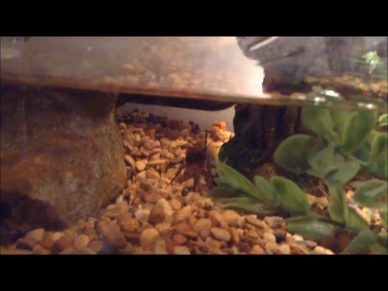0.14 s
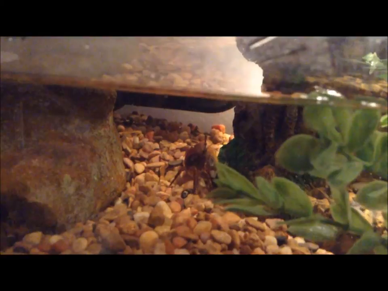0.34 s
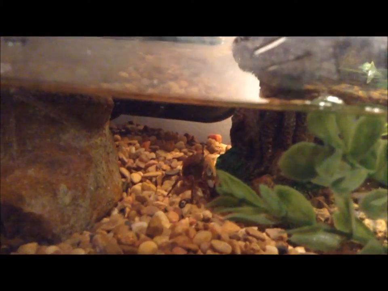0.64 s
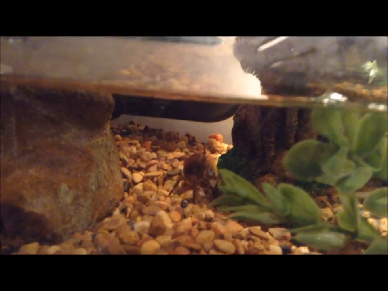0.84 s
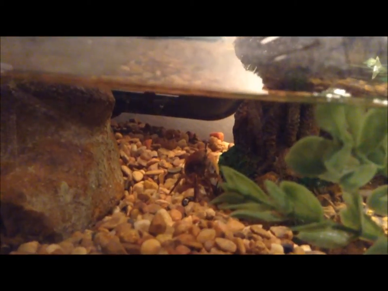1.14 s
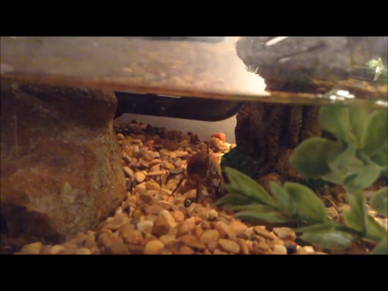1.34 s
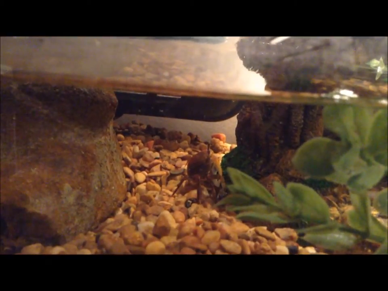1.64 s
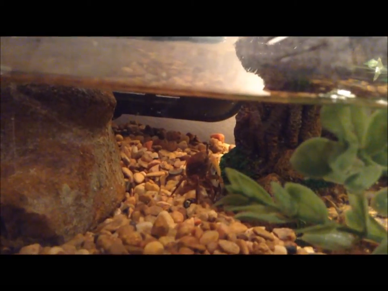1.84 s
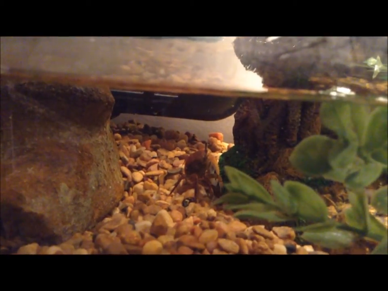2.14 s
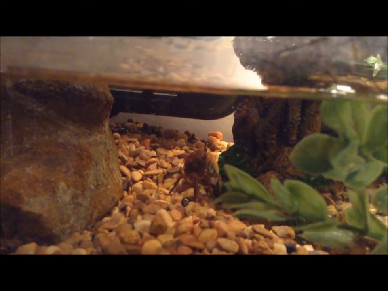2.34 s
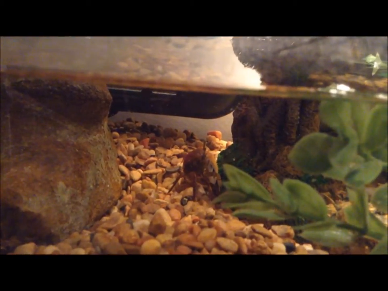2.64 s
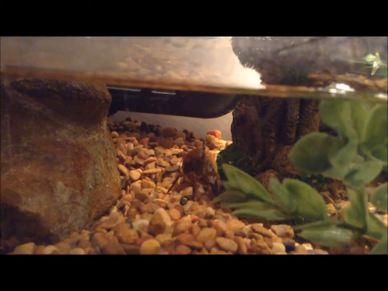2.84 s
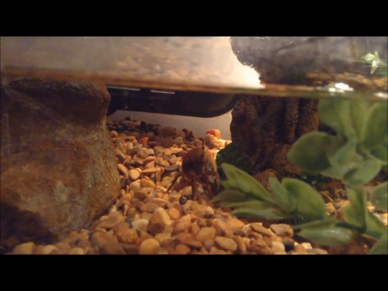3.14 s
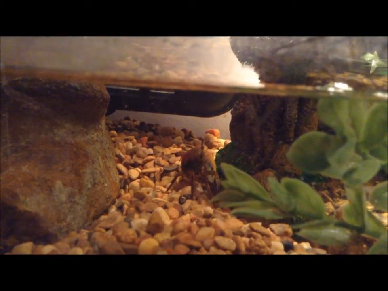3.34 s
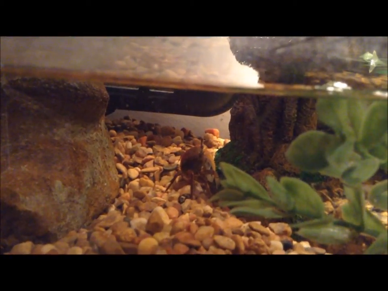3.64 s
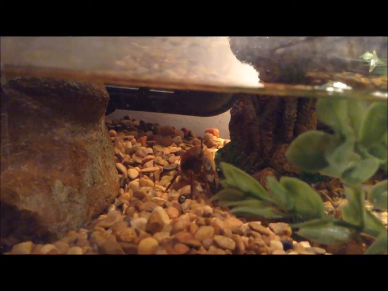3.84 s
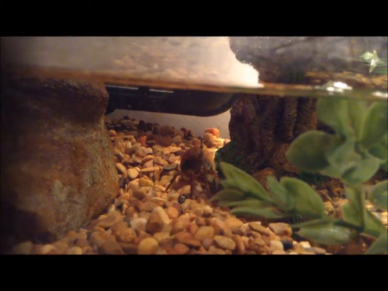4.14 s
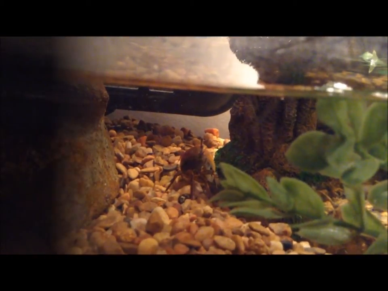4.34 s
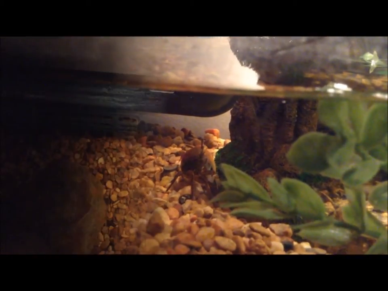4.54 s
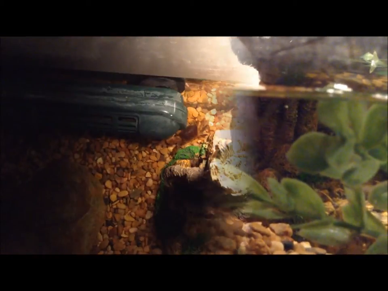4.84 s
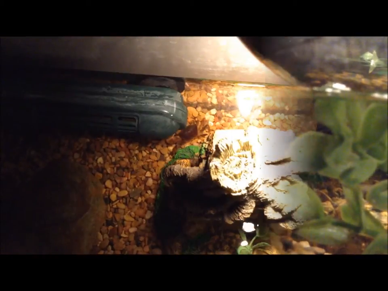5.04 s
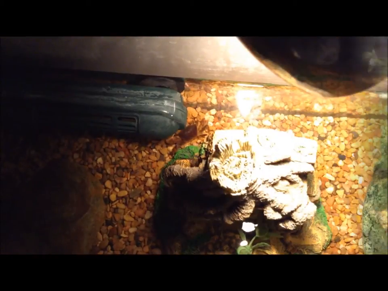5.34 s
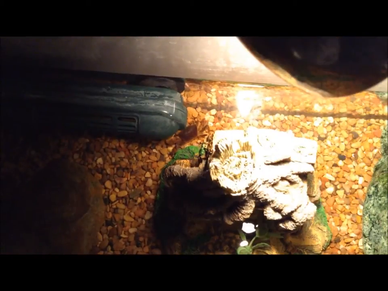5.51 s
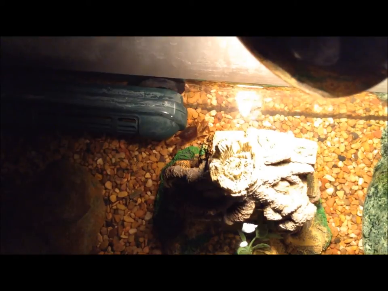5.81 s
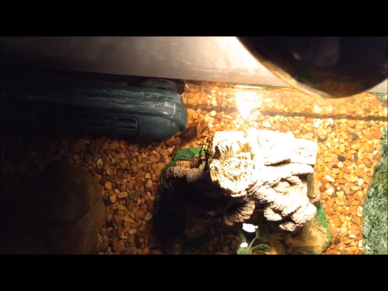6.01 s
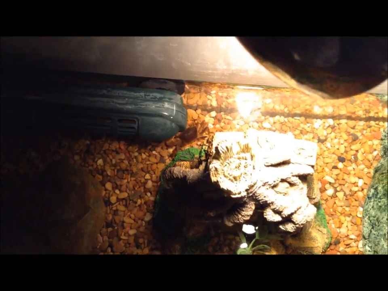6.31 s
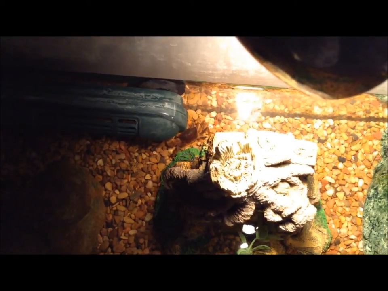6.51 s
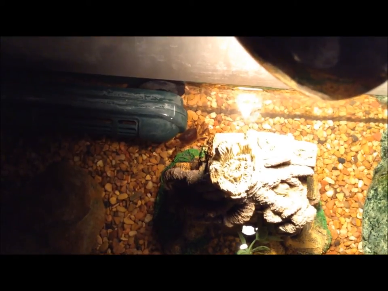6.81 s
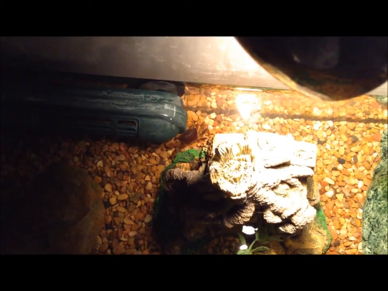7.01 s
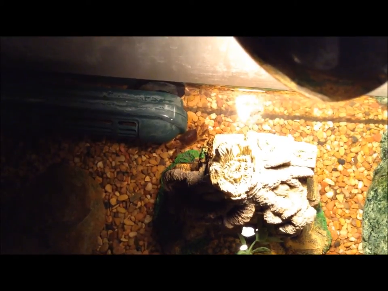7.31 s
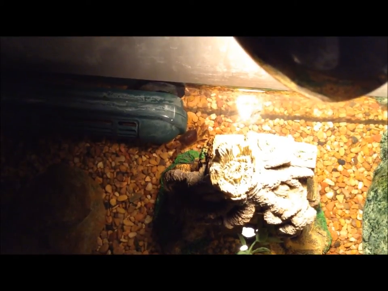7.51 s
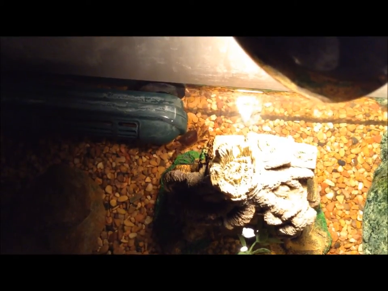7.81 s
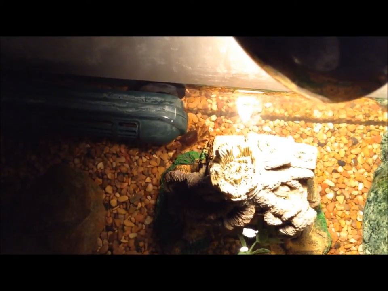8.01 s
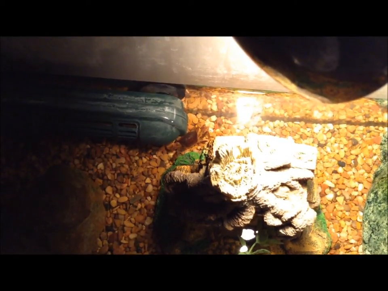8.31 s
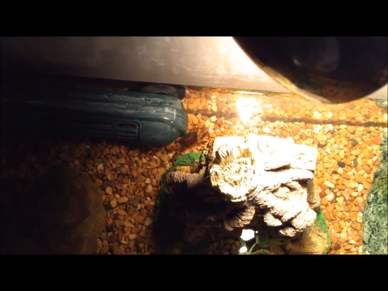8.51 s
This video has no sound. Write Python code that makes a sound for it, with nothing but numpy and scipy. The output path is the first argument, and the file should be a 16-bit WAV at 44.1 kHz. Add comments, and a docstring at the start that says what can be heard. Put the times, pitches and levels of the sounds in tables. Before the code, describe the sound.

A small aquarium filter runs indoors: a low, resonant drone with electrical pump hum and thin hiss, heard at the glass. From 0 to 0.7 s fingers rub and bump the microphone case, with dense low scuffs, gritty hiss and soft thuds; scattered bumps follow, and a heavy cluster of knocks hits around 1.2 s. From about 1.4 to 4 s the drone dominates, with sparse, faint, dull drips and a light rub near 2.3 s and a soft thump at 2.8 s. At 4.1-4.7 s come hissy rubs and two sharp, strong clicks near 4.36 and 4.51 s. Drips then become close, bright and frequent, as heard above the water: ringing bubbles, hollow plops, small splashes and crisp spray over a faint trickle. At about 5.5 s the loud drone abruptly drops to a quieter hum, and irregular dripping continues to the end, around 8.6 s.

```python
"""At an aquarium with its filter running: hum lines from the pump, resonant noise from the tank, thin hiss.
The outflow drips and spits: each drop is a ringing bubble, a hollow plop, a splash and filtered spray.
The microphone is first at the glass: fingers rub (scuff and hiss) and bump (short pulses) its case, and
the drips are dull and distant. Then the drips are heard from above the water, close and bright, and a
quieter hum replaces the loud drone."""
import sys
import numpy as np
from scipy import signal
from scipy.fft import rfft, irfft, next_fast_len
from scipy.io import wavfile
from scipy.ndimage import map_coordinates

SR = 44100
rng = np.random.default_rng(int(sys.argv[2]) if len(sys.argv) > 2 else 0)


def generate_wav(signal):
    """Clip the signal to [-1, 1] and save it as 16-bit WAV at the path in sys.argv[1]."""
    frames = np.transpose(np.atleast_2d(signal))
    scaled = np.clip(frames, -1, 1) * 32767
    pcm = np.round(scaled).astype(np.int16)
    wavfile.write(sys.argv[1], SR, pcm)


N = 381906

# Tank drone at the glass, before GLASS_LEVEL_DB. Each row: frequency in Hz, level in dB per Hz.
GLASS_DRONE_DB = [(30, -114), (70, -103), (105, -88), (170, -78.5), (205, -84), (245, -65), (285, -72.5),
                  (380, -67), (470, -74), (610, -75.5), (760, -86.5), (1150, -90), (1600, -98.5),
                  (2400, -104), (4000, -114)]
# Tank drone above the water. Each row: frequency in Hz, level in dB per Hz.
TOP_DRONE_DB = [(30, -109), (80, -101), (150, -91), (220, -73), (275, -100.5), (380, -82.5), (430, -79),
                (460, -85.5), (540, -80.5), (700, -91.5), (960, -89.5), (1350, -95), (1600, -97),
                (2400, -103), (5000, -116)]
# Main tank resonance. Each row: frequency in Hz, width in Hz, relative level in dB.
TANK_MODES = [(322.4, 27, 0)]
# Pump lines. Each row: multiple of PUMP_HZ, level at the glass in dB, level above the water in dB.
PUMP_LINES = [(1, -63, -57.5), (2, -63.5, -61.5), (3, -55, -65), (6, -81.5, -76), (8, -75, -75),
              (10, -79, -75), (11, -74, -74)]
# Thin steady hiss. Each row: frequency in Hz, level in dB per Hz.
AIR_HISS_DB = [(1000, -104), (3000, -105), (5000, -105), (10000, -107), (13000, -108), (15500, -111)]
# Gain on everything in the drone at the glass. Each row: time in seconds, level in dB.
GLASS_LEVEL_DB = [(0, 1.5), (1.3, -0.54), (2.8, .3), (3.9, -.5), (5, 2.2), (5.5, 1)]
# Fingers sliding on the case. Each row: start in seconds, end in seconds, scuff pitch in Hz,
# nominal scuff level in dB, nominal hiss level in dB.
RUB_STROKES = [(0, .02, 480, -32, -44), (0.019, .07, 620, -31.5, -50.5), (0.053, 0.198, 830, -46.5, -56),
               (.171, 0.436, 600, -39.5, -45.5), (0.368, 0.614, 624, -41.5, -48.5),
               (0.54, 0.725, 643, -46, -55), (1.199, 1.221, 600, -29, -35.5), (1.233, 1.258, 410, -30, -60),
               (2.327, 2.405, 1080, -49.5, -84), (4.125, 4.283, 830, -66, -40.5),
               (4.289, 4.322, 800, -53, -39), (4.332, 4.368, 900, -50, -46),
               (4.408, 4.577, 3740, -63, -50.5), (4.556, 4.652, 1150, -42.5, -63)]
# Scuff spectrum. Each row: multiple of the scuff pitch, relative level in dB.
SCUFF_DB = [(.05, -36.5), (.3, -1.5), (.7, 3.5), (1, 2.5), (1.4, -5.5), (2.5, -7.5), (4.5, -20),
            (14, -70.5)]
# Rubbing hiss spectrum. Each row: frequency in Hz, relative level in dB.
HISS_DB = [(200, -40), (900, 13.5), (2400, 9.5), (3300, 10), (5500, 8.5), (8500, 3), (11000, -1),
           (13500, 1.5), (15500, -25)]
# Fingers bumping the case. Each row: time in seconds, strength in dB, hardness in dB per octave
# (soft pad below 0, nail above), weight in dB of extra thud.
BUMP_HITS = [(.0068, -6, 0.5, 24), (.014, -4, -11.5, 1), (0.0335, 3, -7, 4), (.099, -14.5, 3, 4),
             (.1317, -4, -2, -8), (0.1445, 0.5, 1.5, 18), (.192, -13.5, 3, 0), (.22, -12.5, -10.5, 7),
             (0.235, -6, -1.5, 7), (0.29, -12, -11.5, 0), (.31, -1, -11, 3), (0.3264, -3.5, 3.5, 7),
             (.384, -4.5, -0.5, -5), (0.4279, 3, -3.5, -13), (.452, 6, -9.5, -4.5), (0.4843, 7.5, -7.5, 0),
             (.535, -1.5, -13, -4.5), (.5642, 0.5, -10, -1.5), (.5675, -18, 6.5, 0), (0.6735, 1.5, -4, 7),
             (0.8806, 0.5, -5, 4.5), (1.0696, -0.5, -3, 12), (1.161, -0.5, -3.5, 10.5),
             (1.1926, 9.5, -6.5, 4), (1.2044, 8, -10.5, -3), (1.2102, 18.5, -1.5, -4),
             (1.218, 8, -14.5, -10), (1.2312, 8.5, -13.5, -2.5), (1.338, 2.5, -13, -16),
             (1.356, -3, -11.5, -9.5), (2.049, -22.5, -17.5, -7), (2.1064, -14.5, -16, -5),
             (2.2039, -7.5, -14, -4.5), (2.8083, -7, 3.5, 36), (4.1277, -6, 0, 4),
             (4.256, -11.5, -10.5, 14.5), (4.3589, 17, 6, 1.5), (4.389, -20.5, -13.5, 9.5),
             (4.5144, 19.5, -1.5, -7.5), (4.6197, -2, -4.5, -3), (4.7, -2.5, -4, -11),
             (5.336, -10.5, -7.5, -4), (8.079, -14, -6, -3)]
# Colour of the case. Each row: frequency in Hz, gain in dB.
CASE_DB = [(20, -44.5), (70, -25), (150, -0.5), (280, 7.5), (450, 2), (660, 3.5), (1100, 1.5), (1900, -0.5),
           (2600, -1.5), (3300, -3.5), (4200, -1.5), (6800, 4), (8500, -5), (11000, -0.5), (13200, -14),
           (15000, -17.5), (18000, -21.5)]
# Clearest drips. Each row: time in seconds, bubble pitch in Hz, bubble level in dB, splash level in dB
# (before the shifts that follow drop size).
CLEAR_DRIPS = [(1.439, 2570, -57, -61.5), (1.814, 2480, -53, -69.5), (1.82, 1330, -56.5, -74),
               (1.96, 3240, -52, -63.5), (2.075, 8000, -63, -66), (2.676, 1920, -51.5, -66),
               (2.924, 3200, -59, -53.5), (3.314, 5170, -59.5, -76), (3.343, 2880, -53, -74),
               (3.605, 1720, -55.5, -77), (3.704, 5540, -58, -77.5), (3.914, 2720, -62, -79),
               (4.04, 10900, -68, -65.5), (4.1003, 10300, -57, -72), (4.6858, 2530, -46, -44.5),
               (4.73, 5960, -53, -51.5), (4.761, 5980, -60, -58.5), (4.932, 7200, -49.5, -52),
               (4.989, 3200, -54, -59), (5.1818, 4580, -48.5, -63), (5.215, 5940, -54, -58),
               (5.281, 3080, -56, -68), (5.397, 2560, -43.5, -55.5), (5.42, 1390, -51, -60),
               (5.4782, 3960, -48.5, -51), (5.699, 2600, -48.5, -59.5), (5.837, 4070, -48, -56),
               (5.901, 2320, -45, -56.5), (5.921, 13300, -57, -70), (5.963, 9450, -53.5, -61.5),
               (6.1157, 2660, -68, -54.5), (6.142, 2660, -69, -58), (6.229, 1736, -43.5, -47.5),
               (6.333, 5130, -53.5, -59), (6.379, 5500, -51, -53), (6.411, 5070, -50.5, -53),
               (6.46, 2600, -60, -48.5), (6.4928, 12700, -57, -62), (6.5359, 4280, -49.5, -53),
               (6.554, 5200, -54, -57.5), (6.6324, 2160, -57, -65.5), (6.741, 4610, -47.5, -58.5),
               (6.781, 8950, -53, -59), (6.906, 2660, -42.5, -63), (7.0635, 2690, -54, -53.5),
               (7.104, 6550, -55.5, -62), (7.2204, 1720, -46.5, -52.5), (7.3112, 4200, -49, -53),
               (7.374, 2660, -62, -59), (7.395, 1720, -51.5, -57.5), (7.4236, 6140, -56.5, -56.5),
               (7.462, 4740, -45, -63), (7.638, 1470, -54.5, -65), (7.712, 1460, -56, -81),
               (7.94, 7300, -57.5, -68), (7.999, 2560, -53, -51), (8.026, 8640, -47, -58),
               (8.132, 3250, -46, -49), (8.3344, 4700, -46, -60), (8.3609, 4400, -46, -50.5),
               (8.474, 4970, -46.5, -56.5), (8.532, 6560, -52, -55), (8.6153, 4120, -51, -54.5)]
# Air space over the water, plop: lowest mode and higher. Each row: Hz, width in Hz, relative level in dB.
HOLLOW_MODES = [(1720, 330, 0), (2180, 112, -4)]
# Air space over the water, splash. Each row: frequency in Hz, width in Hz, relative level in dB.
HOOD_MODES = [(2588, 180, 11), (3250, 220, 5.5), (4140, 460, -1), (4750, 150, 1.5)]
# Spray spectrum. Each row: frequency in Hz, relative level in dB.
SPRAY_SPECTRUM_DB = [(3500, -21), (4900, 9.5), (5260, 15.5), (5600, 10.5), (6100, 12), (7600, 3),
                     (8750, 10.5), (9200, 3.5), (9800, 9.5), (11300, -1.5), (12700, 5), (15500, -12)]

PUMP_HZ = 120  # twice the mains frequency
SWITCH_S, FADE_S = 5.487, 0.012  # hum above the water takes over from the drone at the glass
CONTACT_HZ, CONTACT_DROOP_DB = 1496, 3  # middle of a push's spectrum; fall per squared octave from it
CONTACT_OCTAVES = 1.97  # hardness and droop stop changing further out
THUD_HZ = 556  # the finger's weight acts below this
CRACK_HZ, CRACK_OCTAVES = 2050, 0.6  # a heavy blow flexes the case and cracks around this pitch
CRACK_DB_PER_DB = 0.27  # crack growth with blow strength
JOIN_S = 4.05  # drips are close, above the water, from here on
FAR_T60_S, NEAR_T60_S = 0.15, 0.066  # drip echo through the glass; above the water
PLOP_DB, SPRAY_DB = -1, -2  # relative to the splash
MID_DROP_HZ = 3600  # smaller drops ring higher
SPRAY_DB_PER_OCTAVE, HOOD_DB_PER_OCTAVE = 3, -3.5  # smaller drops: more spray, less air-space ring
TOP_HZ, BASS_CUT_HZ = 15450, 45


def amp(db):
    """Decibels to gain."""
    return 10 ** (np.asarray(db) / 20)


def unit(x):
    """Scale to rms 1."""
    return x / np.sqrt(np.mean(x ** 2) + 1e-20)


def colour(points):
    """Gain as a function of frequency, from (Hz, dB) points on a log axis."""
    point_hz, db = np.transpose(points)
    return lambda hz: amp(np.interp(np.log(hz + 1), np.log(point_hz + 1), db))


def resonances(modes):
    """Causal response of (Hz, width Hz, dB) modes, summed with alternating sign."""
    def response(hz):
        total = 0
        for k, (centre_hz, width_hz, db) in enumerate(modes):
            damping = 1j * hz * width_hz
            total = total + (-1) ** k * amp(db) * damping / (centre_hz ** 2 - hz ** 2 + damping)
        return total
    return response


def filtered(x, response):
    """Apply a response of frequency to x."""
    size = next_fast_len(len(x) + 4096)
    return irfft(rfft(x, size) * response(np.fft.rfftfreq(size, 1 / SR)), size)[:len(x)]


def noise(response):
    """Noise whose level per Hz follows the response."""
    return filtered(rng.standard_normal(N), response) * np.sqrt(SR / 2)


def wobble(rate_hz):
    """Smooth random curve, rate_hz knots a second."""
    knots = rng.standard_normal(int(N * rate_hz / SR) + 4)
    return map_coordinates(knots, [np.arange(N) * rate_hz / SR])


def add(track, start_s, sound):
    """Mix a sound into the track."""
    part = track[max(round(start_s * SR), 0):][:len(sound)]
    part += sound[:len(part)]


def pulse(gain):
    """Shortest causal (minimum-phase) pulse with this spectrum, by folding the cepstrum."""
    cepstrum = irfft(np.log(np.maximum(gain, 1e-6)))
    half = len(cepstrum) // 2
    folded = np.r_[cepstrum[0], 2 * cepstrum[1:half], np.zeros(half)]
    return irfft(np.exp(rfft(folded)))


def tank_resonance():
    """Water shakes the tank: noise through its main mode, at rms 1."""
    skirt = colour([(150, -20), (295, 0), (355, 0), (700, -24)])
    return unit(noise(lambda hz: resonances(TANK_MODES)(hz) * skirt(hz)))


def filter_hum(glass_tank_db=-42.0, top_tank_db=-52.5, churn_db=1.0, top_db=-0.1):
    """Pump lines, the water-shaken tank and a thin hiss, crossfaded from the glass to above the water."""
    t = np.arange(N) / SR
    glass = noise(colour(GLASS_DRONE_DB)) + amp(glass_tank_db) * tank_resonance()
    top = noise(colour(TOP_DRONE_DB)) + amp(top_tank_db) * tank_resonance()
    # the flow churns unevenly
    glass = glass * amp(churn_db * wobble(14)) + noise(colour(AIR_HISS_DB))
    top = top * amp(churn_db * wobble(12)) + noise(colour(AIR_HISS_DB))
    for multiple, at_glass_db, above_db in PUMP_LINES:
        line = np.sqrt(2) * np.sin(2 * np.pi * (round(multiple) * PUMP_HZ * t + rng.random()))
        glass = glass + amp(at_glass_db) * line
        top = top + amp(above_db) * line
    switched = np.clip((t - SWITCH_S) / FADE_S, 0, 1)
    glass_db = np.interp(t, *np.transpose(GLASS_LEVEL_DB))
    return (1 - switched) * amp(glass_db) * glass + switched * amp(top_db) * top


def rubs(grip_db=2.5, grain_db=2.0, press_db=0.6, grit=0.42, grit_rate_hz=190):
    """Skin sticks and slips on the case: a low scuff and a gritty hiss that swell with each stroke."""
    t = np.arange(N) / SR
    slips = (rng.random(N) < grit_rate_hz / SR) * rng.laplace(size=N)  # many small, a few sharp
    grains = unit(filtered(slips, lambda hz: colour(HISS_DB)(hz) / (1 + (hz / 6000) ** 2)))
    hiss = unit(noise(colour(HISS_DB)) * amp(grain_db * wobble(640)))
    sliding = unit(hiss + grit * grains)
    grip, pressure = amp(grip_db * wobble(160)), amp(press_db * wobble(45))
    track = np.zeros(N)
    for start_s, end_s, pitch_hz, scuff_db, hiss_db in RUB_STROKES:
        span = (t >= start_s) & (t < end_s)
        stroke = np.sqrt(np.abs(np.sin(np.pi * (t[span] - start_s) / (end_s - start_s))))
        scuff_colour = colour([(k * pitch_hz, db) for k, db in SCUFF_DB])
        scuff = unit(filtered(rng.standard_normal(N)[span], scuff_colour) * grip[span])
        track[span] += stroke * (amp(scuff_db) * scuff + amp(hiss_db) * sliding[span])
    return track * pressure


def bumps(place_db=2.5, lag_s=0.00027, rattle_db=-14, rattle_t60_s=0.023, size=4096):
    """Each bump is one short push through the case, with a brief rattle after it."""
    track, hz, t = np.zeros(N), np.fft.rfftfreq(size, 1 / SR), np.arange(size) / SR
    # bending waves bring the treble first; lag_s is the delay at 1 kHz
    bending = np.exp(-4j * np.pi * lag_s * np.sqrt(1000 * hz))
    octaves = np.clip(np.log2((hz + 1) / CONTACT_HZ), -CONTACT_OCTAVES, CONTACT_OCTAVES)
    bass = 1 / (1 + (hz / THUD_HZ) ** 4)
    crack = np.exp(-(np.log2((hz + 1) / CRACK_HZ) / CRACK_OCTAVES) ** 2)
    rattle_colour = colour([(700, 10.0), (1500, 4.5), (4000, -19), (10000, -15.0)])
    for start_s, db, hardness, weight_db in BUMP_HITS:
        # each spot on the case favours its own resonances
        spot = amp(place_db * map_coordinates(rng.standard_normal(40), [np.sqrt(hz) / 4]))
        contact_db = db + hardness * octaves - CONTACT_DROOP_DB * octaves ** 2 + weight_db * bass
        crack_db = CRACK_DB_PER_DB * max(db, 0) * crack
        gain = spot * colour(CASE_DB)(hz) * amp(contact_db + crack_db)
        push = irfft(rfft(pulse(gain)) * bending)[:size // 2]
        tail = rng.standard_normal(size) * amp(-60 * t / rattle_t60_s)
        rattle = filtered(signal.fftconvolve(push, tail / np.linalg.norm(tail)), rattle_colour)
        add(track, start_s, push)
        add(track, start_s, amp(rattle_db) * rattle)
    return track


def drip(hz, bubble_db, plop_db, splash_db, spray_db, t60_s, cycles=28, rise=0.023,
         bubble_direct=0.42, smack_direct=0.53, room_db=-22, room_t60_s=0.31):
    """A drop smacks the surface and traps a bubble; both scatter between the tank's walls."""
    t = np.arange(SR // 4) / SR
    # close drips arrive directly, far ones swell out of their echo
    near = np.clip((0.16 - t60_s) / 0.083, 0, 1)
    onset = 1 - np.exp(-t / (0.0001 + 0.0063 * (1 - near)))
    decay = onset * (amp(-60 * t / t60_s) + amp(room_db - 60 * t / room_t60_s))

    def echo(direct=smack_direct):
        """Decaying noise for the walls plus a direct click for near drips."""
        walls = decay * rng.standard_normal(len(t))
        return walls / np.linalg.norm(walls) + direct * near * (t == 0)

    age = t * hz / cycles  # 1 when the bubble has fallen 60 dB
    # the pitch climbs as the bubble nears the surface
    phase = 2 * np.pi * hz * t * (1 + rise * (np.minimum(age, 1) - 0.25))
    bubble = (1 - np.exp(-t * hz)) * amp(-60 * age) * np.sin(phase)
    ring = signal.fftconvolve(bubble, echo(bubble_direct))[:len(t)]
    plop_band = colour([(800, -24), (1550, 0), (2200, 0), (4000, -20)])
    plop = filtered(echo(), lambda f: resonances(HOLLOW_MODES)(f) * plop_band(f))
    splash_band = colour([(1300, -20), (2400, 0), (5000, 0), (8000, -14)])
    splash = filtered(echo(), lambda f: resonances(HOOD_MODES)(f) * splash_band(f))
    spray = filtered(echo(), colour(SPRAY_SPECTRUM_DB))
    parts = zip((bubble_db, plop_db, splash_db, spray_db), (ring, plop, splash, spray))
    # levels are rms over 20 ms
    return sum(amp(db) * unit(part) for db, part in parts) * np.sqrt(0.02 / t[-1])


def drop(hz, bubble_db, splash_db, t60_s):
    """A drip whose splash follows its size: big drops ring the air space, small ones throw spray."""
    small_octaves = np.log2(hz / MID_DROP_HZ)
    hood_db = splash_db + HOOD_DB_PER_OCTAVE * small_octaves
    spray_db = splash_db + SPRAY_DB + SPRAY_DB_PER_OCTAVE * small_octaves
    return drip(hz, bubble_db, splash_db + PLOP_DB, hood_db, spray_db, t60_s)


def outflow(trickle_db=-66, trickle_hz=2400, spread_octaves=0.9, scatter_db=4,
            trickle_splash_db=-6, count=90):
    """Single drips, and above the water a faint trickle of random small drops between them."""
    water = np.zeros(N)
    for start_s, hz, bubble_db, splash_db in CLEAR_DRIPS:
        t60_s = FAR_T60_S if start_s < JOIN_S else NEAR_T60_S
        add(water, start_s, drop(hz, bubble_db, splash_db, t60_s))
    for start_s, pitch, level in rng.uniform([JOIN_S, -1, -1], [N / SR, 1, 1], (count, 3)):
        hz = trickle_hz * 2 ** (spread_octaves * pitch)
        db = trickle_db + scatter_db * level
        add(water, start_s, drop(hz, db, db + trickle_splash_db, NEAR_T60_S))
    return water


def scene():
    """Tank, handling and water in one channel."""
    return (filter_hum() + rubs() + bumps() + outflow())[None]


def record(dry):
    """The input clips at full scale; the deepest bass and everything above TOP_HZ are cut."""
    def band(hz):
        bass_cut = 1j * hz / (BASS_CUT_HZ + 1j * hz)
        return bass_cut / np.sqrt(1 + (hz / TOP_HZ) ** 160)
    return np.array([filtered(np.clip(x, -1, 1), band) for x in dry])


dry = scene()
out = record(dry)
generate_wav(out)
```